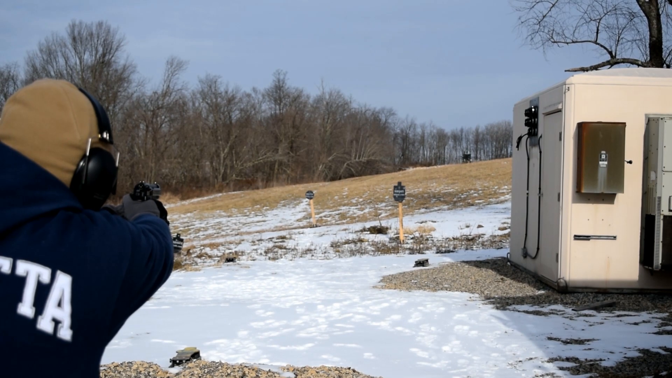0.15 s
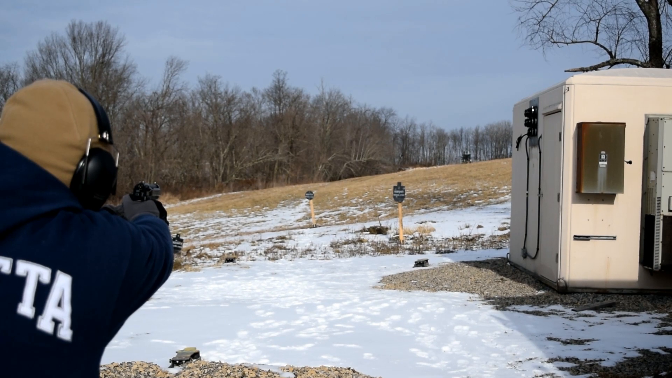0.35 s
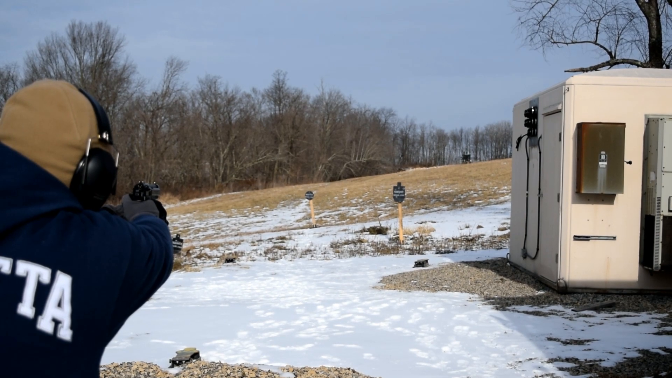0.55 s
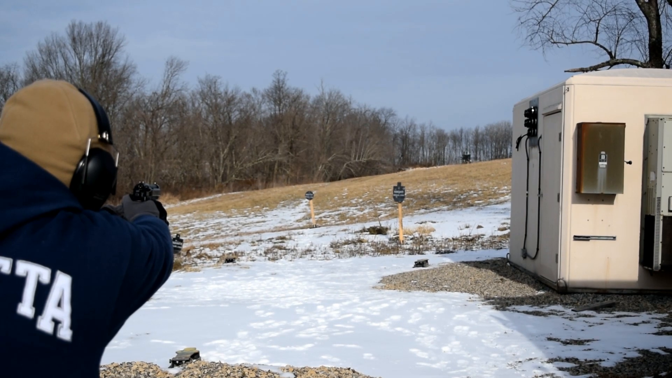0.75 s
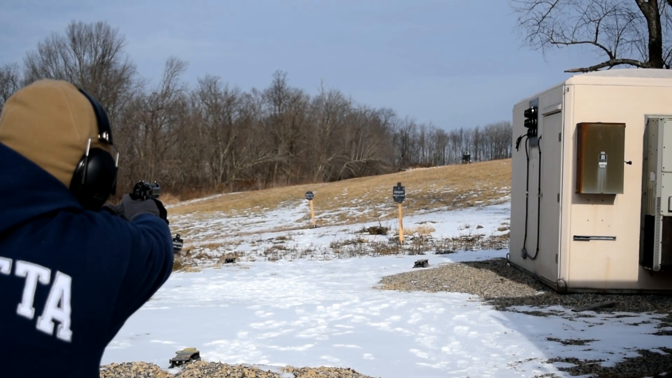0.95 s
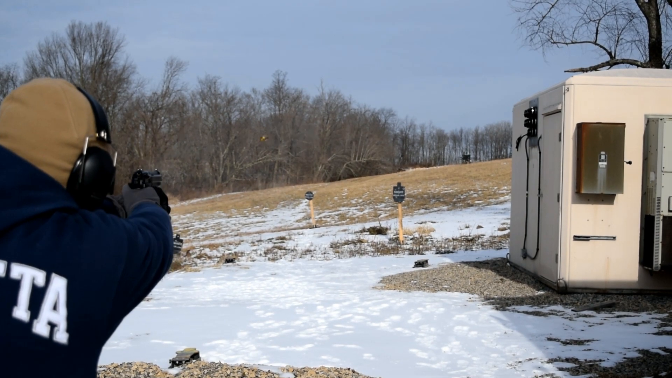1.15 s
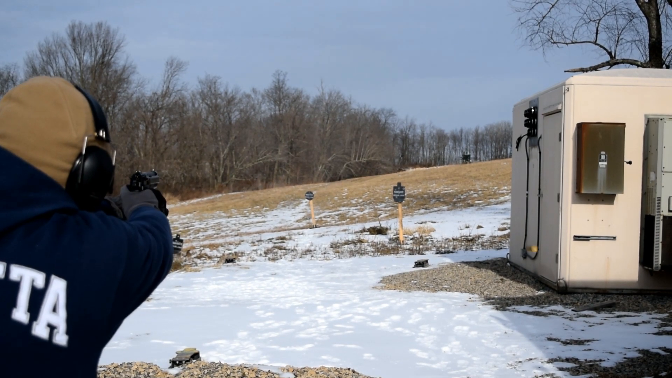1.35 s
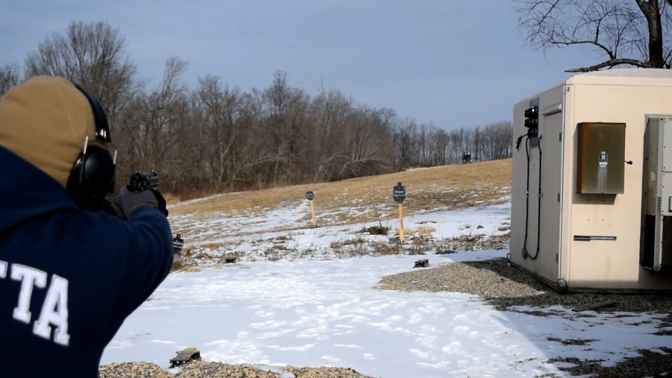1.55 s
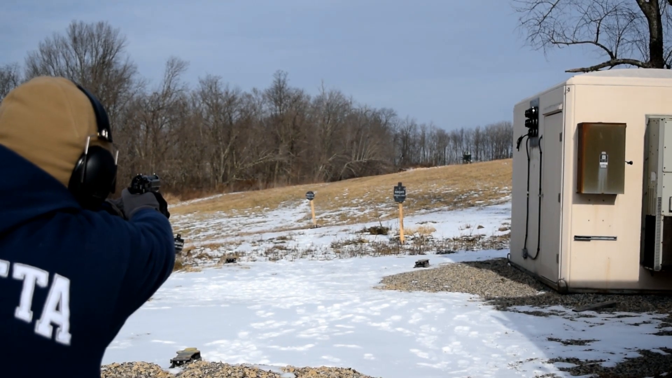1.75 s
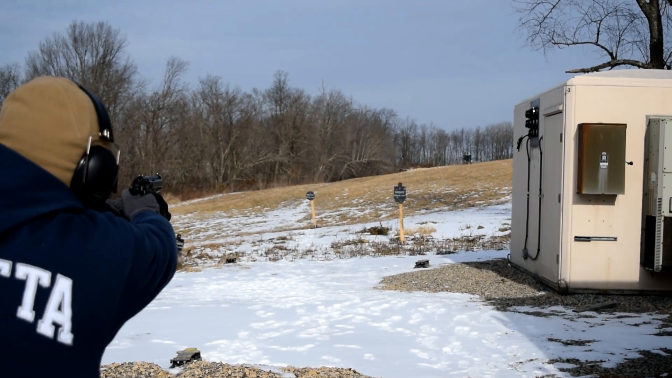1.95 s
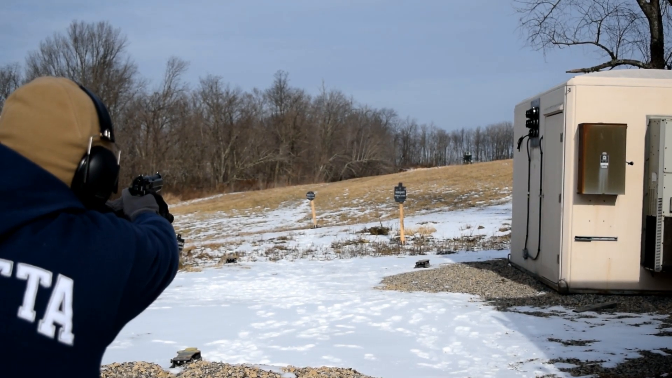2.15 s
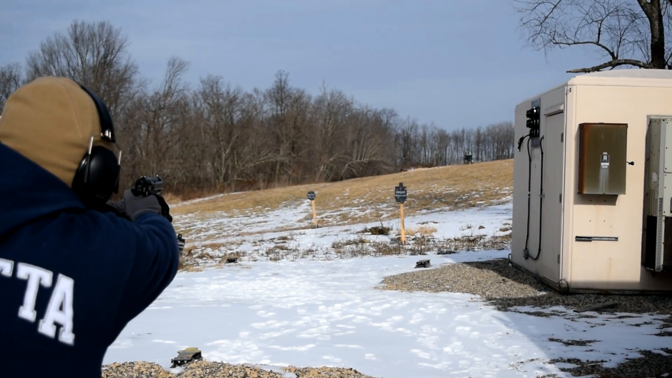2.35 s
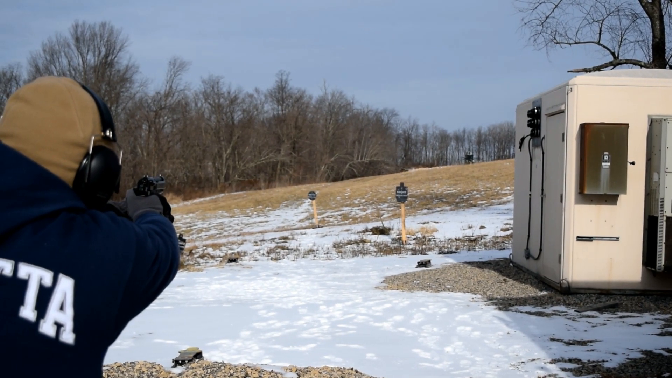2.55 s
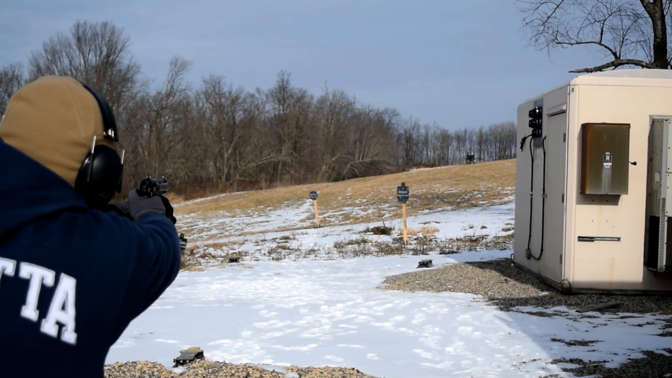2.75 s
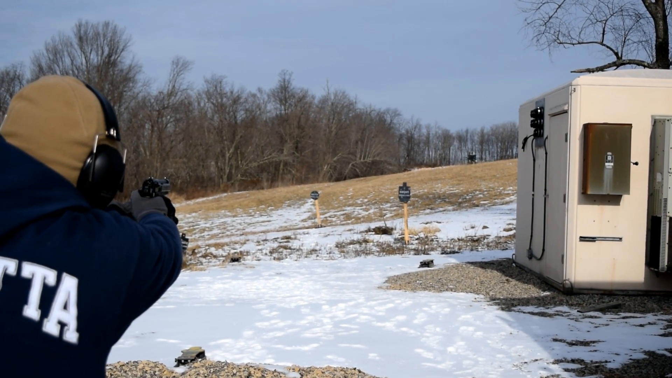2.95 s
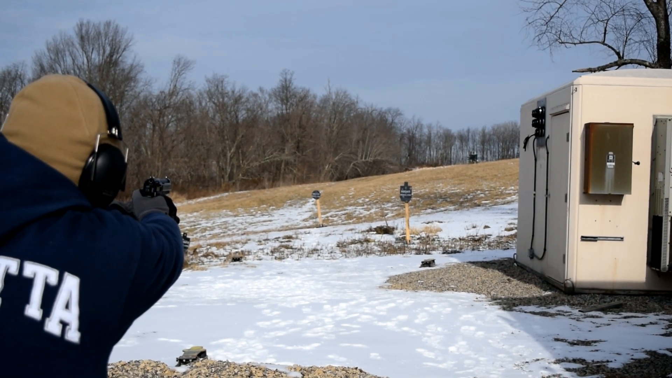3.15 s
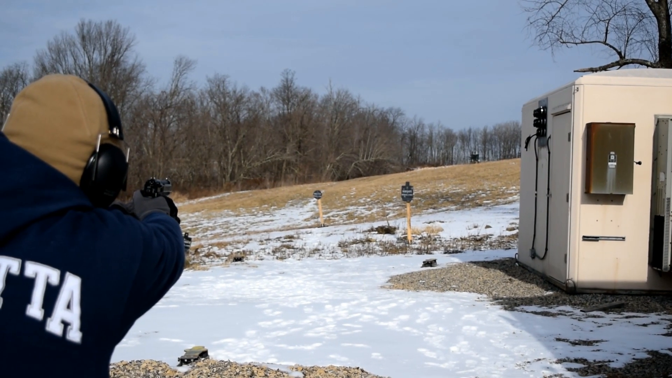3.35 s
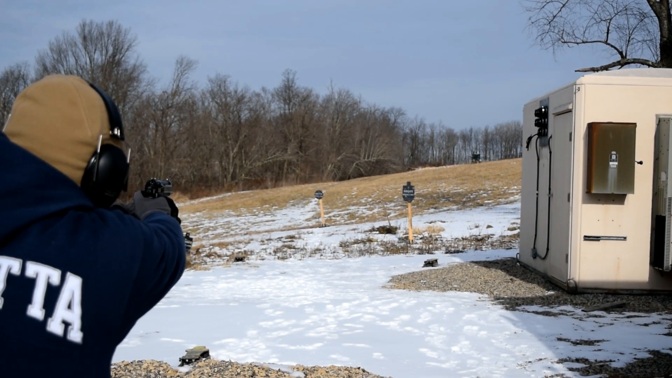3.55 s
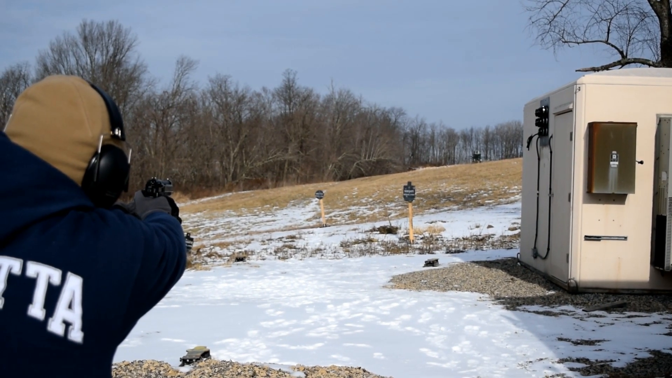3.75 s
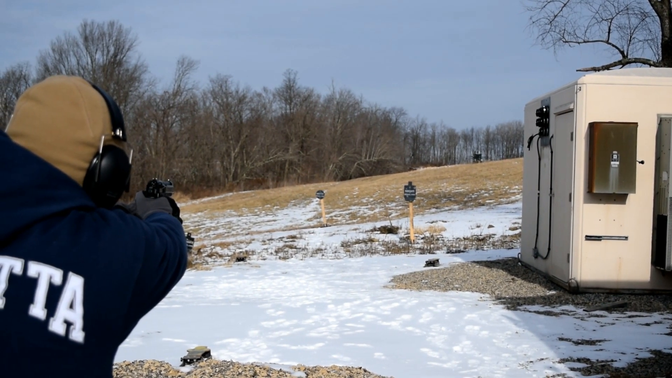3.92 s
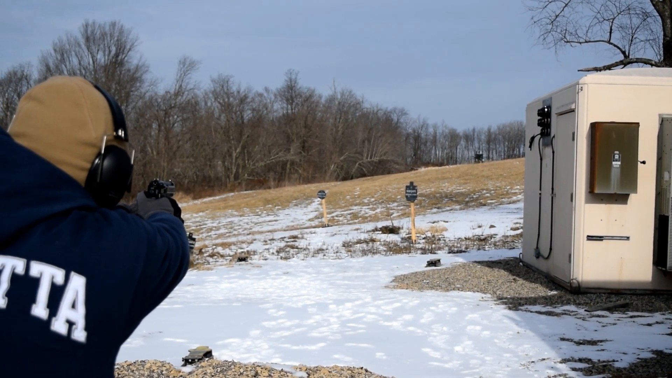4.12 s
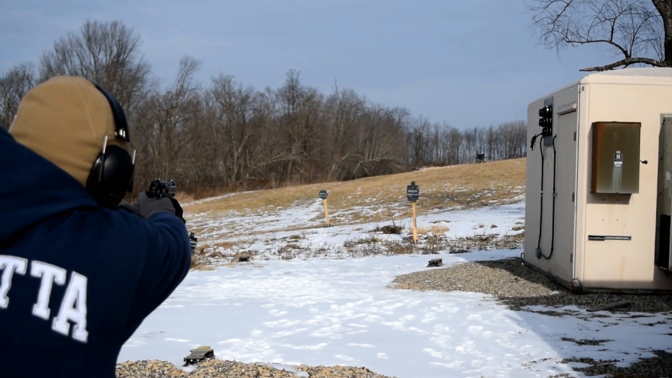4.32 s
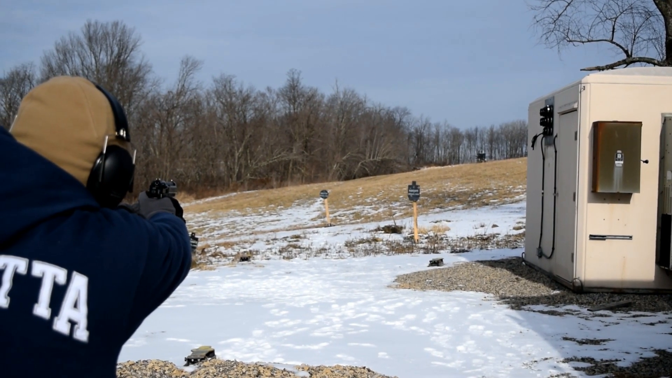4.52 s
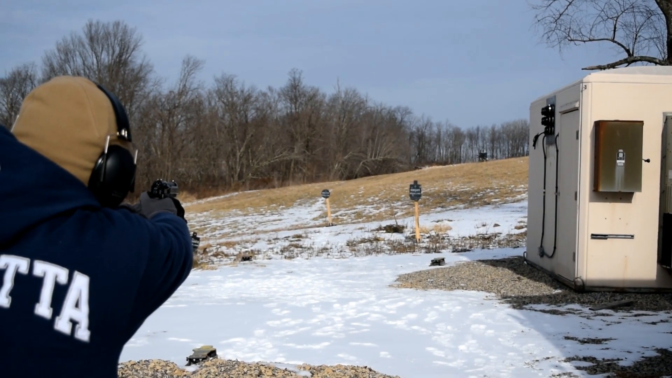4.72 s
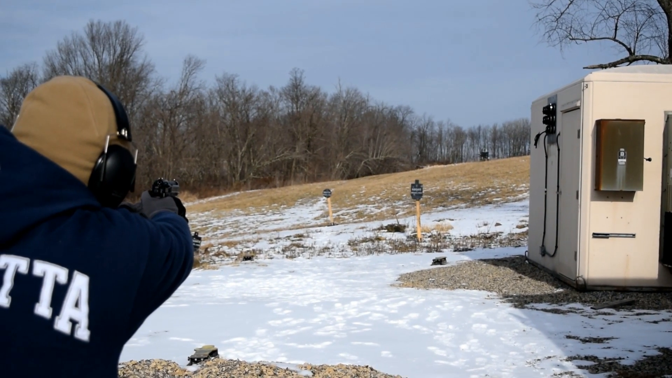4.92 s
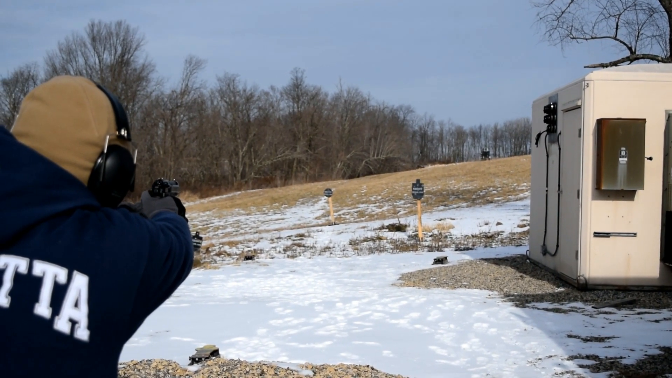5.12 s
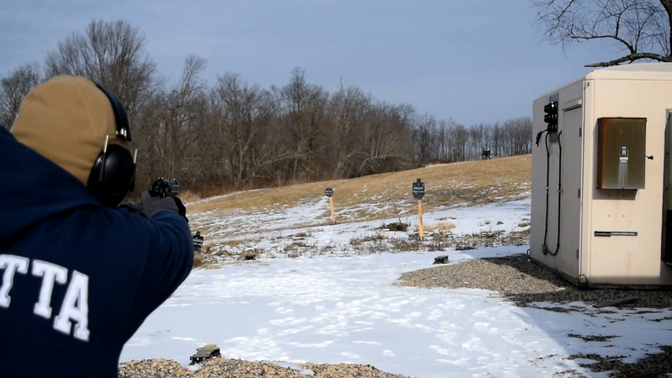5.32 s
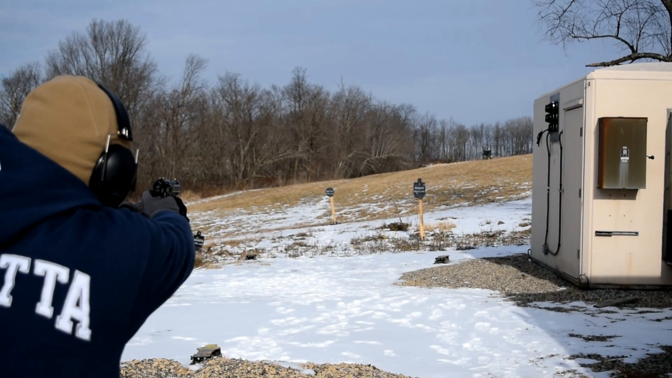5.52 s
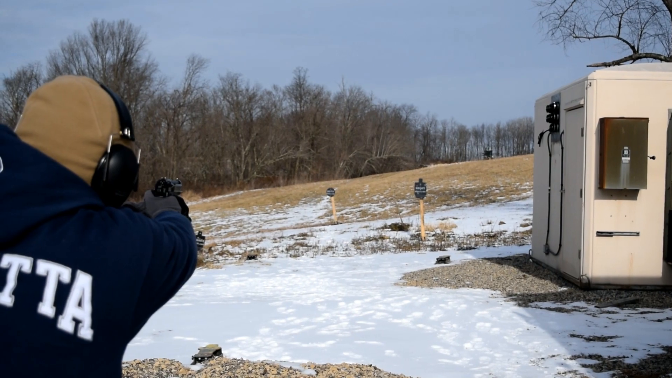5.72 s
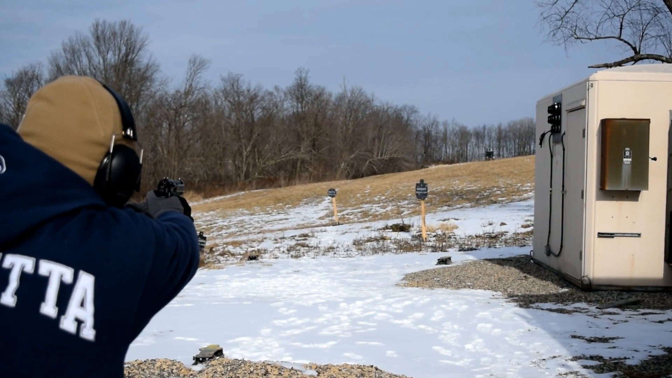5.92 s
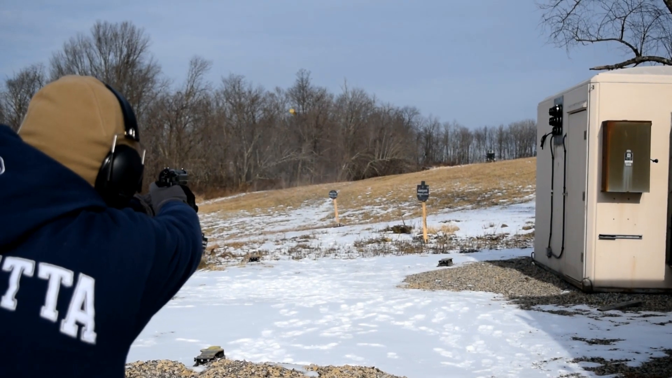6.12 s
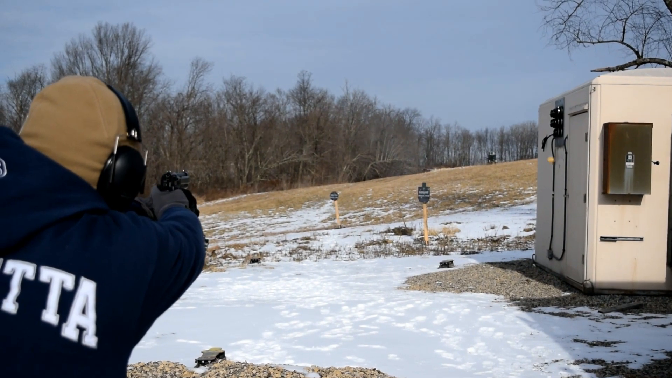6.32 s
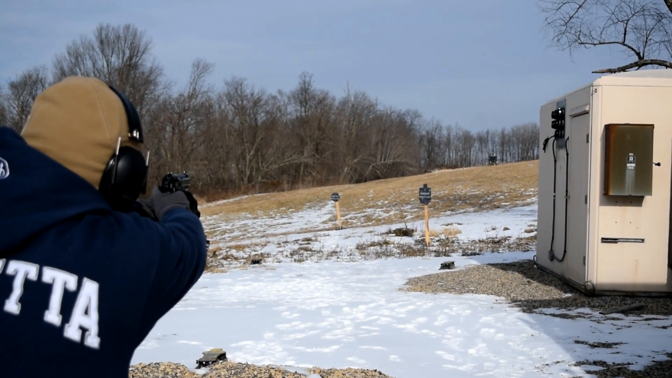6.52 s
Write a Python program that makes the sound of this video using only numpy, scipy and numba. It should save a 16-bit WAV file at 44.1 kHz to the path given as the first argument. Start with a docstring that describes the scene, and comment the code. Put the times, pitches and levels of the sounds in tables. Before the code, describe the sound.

Light wind buffets a small microphone outdoors over a faint hiss. At about 1.1 seconds a pistol fires close by, a sharp, bright crack that briefly overloads the microphone. Quick slaps return from nearby sheds and banks, then a duller echo rolls back from wooded hills, with a few dull peaks between 1.9 and 2.5 seconds, fading over the next couple of seconds. A small nearby click comes at about 3.1 seconds. Soft, low bumps and rustles of camera handling come and go between 3.5 and 5.7 seconds, along with gentle gusts. A distant bird gives two very faint falling whistles at about 4.1 and 4.4 seconds. At about 6.1 seconds a second close shot cracks, just as loud, with the same slaps and a rolling echo that is still sounding at the end, about half a second later.

```python
"""Two pistol shots on an open range, close to a small camera microphone. Each blast overloads the
microphone and steps its gain control down, slaps back from nearby sheds and banks, then rolls back from
the wooded hills for seconds. A few dull echo peaks carry the tick of the camera's gain stepping down;
other small clicks are nearby. Short low bumps and rustles of camera handling sit over light wind, and a
far bird whistles twice above a faint hiss."""
import sys
import numpy as np
from scipy import signal
from scipy.fft import rfft, irfft, next_fast_len
from scipy.io import wavfile
from scipy.ndimage import map_coordinates
from numba import njit

SR = 44100
rng = np.random.default_rng(int(sys.argv[2]) if len(sys.argv) > 2 else 0)


def generate_wav(sig):
    """Save sig (samples, or channels by samples) to the path in sys.argv[1] as 16-bit PCM at SR."""
    pcm = np.round(np.clip(np.atleast_2d(sig).T, -1, 1) * 32767).astype(np.int16)
    wavfile.write(sys.argv[1], SR, pcm)


N = 294403
TIME = np.arange(N) / SR

# The shots: start_s, gain_db (added to the levels of their cracks and echoes)
SHOTS = [(1.0986, -2), (6.0678, -0.5)]
# Spectrum of a near reflection: frequency_hz, level_db
SHARP_COLOUR = [(60, -58), (100, -26), (560, -7), (1200, -8.5), (2040, -12), (2300, -11), (2600, -4.5),
                (3050, -13), (3400, -16.5), (7140, -24.5), (8460, -28.5), (16000, -40)]
# Spectrum after a path through air and trees: frequency_hz, level_db
DULL_COLOUR = [(100, -69), (300, -24.5), (400, -15), (600, -5), (860, 1), (1200, -8), (1550, -22),
               (2630, -31), (3250, -47), (6800, -66.5), (12000, -83.5)]


def muzzle():
    """The bright crack at the muzzle, close up: two beats about a millisecond apart."""
    beats = [(0, 2.5), (.0012, 15)]  # delay_s, level_db
    return cracks([(start + delay, shot_db + db) for start, shot_db in SHOTS for delay, db in beats])


def slaps():
    """Each surface returns a sharp pulse and a dull packet as long as it is deep; broad ones thump."""
    # Single reflections: delay_s, sharp_db, dull_db, pitch_hz, spread_s
    surfaces = [(0, 15.5, 14, 820, 0.0016), (.054, 7, 14, 824, 0.0015), (0.062, 0.5, 1, 1029, 0.0058),
                (0.0673, 2.5, -9.5, 1006, 0.0042), (.079, -18, 12.5, 736, 0.0008),
                (0.0812, 2, -18.5, 1060, .0039), (.1065, -16.5, 3.5, 930, 0.0028),
                (0.124, 3.5, 3, 1010, 0.0016), (0.1274, 8.5, 13.5, 1360, 0.00065),
                (0.1708, 17.5, 15, 1320, 0.00098), (0.1448, -12.5, -16, 990, 0.0029),
                (.155, -15, -5, 1000, 0.0015), (0.202, -4, -10, 1000, 0.0045),
                (0.225, -7.5, -5, 1040, 0.0019), (0.248, -21, -11, 1060, 0.002),
                (.339, -19, 8.5, 936, 0.00053), (.346, -27, -2.5, 906, .0015),
                (.358, -12.5, -11, 900, 0.0037), (.377, -19, 0.5, 775, 0.0026),
                (0.401, -24, 3.5, 936, 0.0036), (.423, -15, 8.5, 826, 0.0034), (0.498, -19, 9, 956, 0.0025),
                (.448, -18, -0.5, 900, .004), (0.902, -52, 10.5, 856, 0.0049),
                (1.403, -48, -5.5, 883, 0.0075), (1.76, -36, -10.5, 915, 0.0016),
                (1.871, -38, -13, 950, 0.0019)]
    broad_surfaces = [(0, -3.5), (0.053, -3.5), (.082, -22.5), (.17, -17.5), (0.281, -17.5), (.315, -11),
                      (0.339, -13.5)]  # bass returns: delay_s, peak_db
    thump_colour = [(20, -5.5), (50, 0.5), (110, 2.5), (220, -1), (350, -14.5), (700, -51.5), (2000, -65.5)]  # frequency_hz, level_db
    sharp, dull, thump = np.zeros((3, N + 3 * SR))
    t = TIME[:SR // 10]
    pulse = t == 0
    for start, shot_db in SHOTS:
        for delay, sharp_db, dull_db, pitch_hz, spread in surfaces:
            at = round((start + delay) * SR)
            rough_edge = 0.22 * amp(-60 * t / 0.006) * rng.standard_normal(len(t))
            sharp[at:][:len(t)] -= amp(shot_db + sharp_db) * (pulse + rough_edge)
            packet = t / spread * np.exp(.5 - .5 * (t / spread) ** 2)
            dull[at:][:len(t)] -= amp(shot_db + dull_db) * packet * np.sin(2 * np.pi * pitch_hz * t)
        for delay, peak_db in broad_surfaces:
            at = round((start + delay) * SR)
            rumble = 0.096 * amp(-60 * t / 0.14) * rng.standard_normal(len(t))
            thump[at:][:len(t)] -= amp(shot_db + peak_db) * (pulse + rumble)
    return peak_coloured(sharp, SHARP_COLOUR) + dull[:N] + peak_coloured(thump, thump_colour)


def roll():
    """Countless trunks and slopes return the blast, strong ones in lumps and crackles, late ones duller."""
    air_loss = [(100, -0.5), (3000, 0), (5000, -2.5), (8000, -7.5), (16000, -21.5)]  # treble lost on a long path: frequency_hz, gain_db
    far_colour = [(100, -49.5), (280, -24.5), (420, -14), (650, -1), (900, -4), (1200, -12), (1550, -28),
                  (2630, -51), (5000, -74)]  # spectrum from the farthest hills: frequency_hz, level_db
    treble_loss_s = 0.23
    out = np.zeros(N)
    for start, shot_db in SHOTS:
        since = TIME - start
        sharp, dull = ground_envelopes(since)
        lumps = amp(shot_db) * unit(amp(2.2 * wobble(90))) * dull
        crackles = amp(shot_db) * unit(amp(3 * wobble(220))) * sharp
        bright = coloured(crackles * rng.standard_normal(N), SHARP_COLOUR)
        muffled = coloured(bright, air_loss) / np.abs(np.sum(response(air_loss)))  # bass keeps its level
        lost = np.clip(since / treble_loss_s, 0, 1)
        out += (1 - lost) * bright + lost * muffled
        far_mix = np.clip((since - .6) / 1.38, 0, 1) * np.pi / 2  # later returns have come farther
        out += coloured(lumps * np.cos(far_mix) * rng.standard_normal(N), DULL_COLOUR)
        out += coloured(lumps * np.sin(far_mix) * rng.standard_normal(N), far_colour)
    return out


def ground_envelopes(since):
    """Sharp and dull gains of the roll: each ground swells in, its dull part holds, both fall."""
    # Scattering grounds, near to far:
    # delay_s, swell_s, sharp_db, sharp_fall_db_per_s, dull_db, dull_hold_s, dull_fall_db_per_s
    grounds = [(0, .003, 10.5, 853, 14.5, .014, 1051), (0.039, .012, -20.5, 60.5, -7.5, 0.016, 95.5),
               (0.179, .12, -14, 34, -9.5, .16, 299), (0.329, 0.055, -30, 31.5, 2, 0.66, 35),
               (1.914, 0.077, -80, 27, -15, 0.12, 95), (1.952, 0.091, -83, 30, -29, 0.41, 31)]
    sharp_power, dull_power = np.zeros((2, N))
    for delay, swell_s, sharp_db, sharp_fall, dull_db, hold, dull_fall in grounds:
        t = np.maximum(since - delay, 0)
        swell = 1 - np.exp(-t / swell_s)
        sharp_power += (swell * amp(sharp_db - sharp_fall * t)) ** 2
        dull_power += (swell * amp(dull_db - dull_fall * np.maximum(t - hold, 0))) ** 2
    return np.sqrt(sharp_power), np.sqrt(dull_power)


def cracks(events):
    """Bright bursts of a few milliseconds with a faint tail, from rows of start_s, level_db."""
    crack_colour = [(500, -24.5), (1900, -7.5), (2650, 3.5), (3400, -1.5), (4500, 1), (5800, -3),
                    (7700, 3.5), (10500, -6), (14000, -1), (17000, -20)]  # frequency_hz, level_db
    bursts, t = np.zeros(N + SR), TIME[:SR // 20]
    for start, db in events:
        envelope = amp(db - 60 * t / 0.0074) + amp(db - 25.5 - 60 * t / 0.12)
        bursts[round(start * SR):][:len(t)] += envelope * rng.standard_normal(len(t))
    return coloured(bursts[:N], crack_colour)


def echo_peaks_and_clicks():
    """Dull echo peaks with the tick of the camera's gain stepping down, and small nearby clicks."""
    # The four rows from 1.92 to 2.38 s are the echo peaks, the rest clicks: start_s, tick_db, dull_db
    events = [(.243, -65, -28), (1.8059, -19, -26.5), (1.812, -26.5, -40), (1.863, -35.5, -14),
              (1.9228, -32, 12), (1.986, -29, 5), (2.0801, -30.5, 10), (2.3785, -37.5, -5),
              (3.0788, -10.5, -24), (3.084, -33, -34), (3.0897, -20, -18), (4.957, -51, -27),
              (6.331, -23, -29), (6.333, -15, -41), (6.336, -22, 4)]
    pulses = np.zeros(N)
    for start, _, dull_db in events:
        pulses[round(start * SR)] = amp(dull_db)
    return cracks([row[:2] for row in events]) + peak_coloured(pulses, DULL_COLOUR)


def wind():
    """Light wind buffets the microphone in low lumps."""
    strength = [(0, -39), (.23, -26), (.5, -35.5), (.65, -26.5), (.82, -32.5), (1.07, -31), (2.75, -29),
                (3.05, -32.5), (3.4, -26.5), (3.7, -25.5), (3.9, -22), (4.22, -31.5), (4.36, -22),
                (4.52, -31), (5.1, -21), (5.35, -26), (5.54, -21.5), (6.04, -36)]  # course of the buffeting: time_s, level_db
    buffet_colour = [(12, -8), (22, 5), (65, 2), (120, -6.5), (180, -20), (300, -58.5)]  # frequency_hz, level_db
    buffet_db = np.interp(TIME, *np.transpose(strength))
    return amp(buffet_db) * unit(amp(1.8 * wobble(15)) * noise(buffet_colour))


def handling():
    """Short low bumps and rustles of camera handling, rising from a soft bed of noise over the wind."""
    bumps = [(0.659, 0.054, 2), (3.099, 0.026, 0.5), (3.558, 0.042, 11), (3.81, 0.027, 7.5),
             (3.9, 0.015, 8.5), (4.36, .02, -3), (4.7, 0.036, 7.5), (4.97, .04, 0), (5.66, 0.025, 5.5)]  # centre_s, spread_s, rise_db
    rustle_colour = [(90, -36), (170, -4), (260, -3.5), (340, -9), (530, -12.5), (750, -16.5), (960, -15.5),
                     (1250, -30), (1800, -63)]  # frequency_hz, level_db
    bed_db = -37.5
    rise_db = sum(db * np.exp(-.5 * ((TIME - centre) / spread) ** 2) for centre, spread, db in bumps)
    rustle = unit(amp(1.1 * wobble(25) + 1.1 * wobble(5)) * noise(rustle_colour))
    return amp(bed_db + rise_db) * rustle


def bird():
    """A far bird's whistles slide down and flutter on their long way through moving air."""
    whistles = [(4.135, .14, 2700, 1500, .16, -60), (4.415, .13, 2900, 2090, .033, -60.5)]  # start_s, length_s, start_hz, aim_hz, glide_s, level_db
    fade_s = 0.017
    out = np.zeros(N)
    for start, length, start_hz, aim_hz, glide, db in whistles:
        t = TIME - start
        envelope = np.clip(np.minimum(t, length - t) / fade_s, 0, 1)
        flutter = amp(db + 3.3 * wobble(110))
        pitch_hz = aim_hz + (start_hz - aim_hz) * np.exp(-np.maximum(t, 0) / glide) + 35 * wobble(150)
        out += envelope * flutter * np.sqrt(2) * np.sin(2 * np.pi * np.cumsum(pitch_hz) / SR)
    return out


def hiss():
    """The microphone's own steady noise."""
    hiss_colour = [(300, -23), (1000, 7.5), (2000, -1), (7000, -4.5), (13500, -4), (16000, -5)]  # frequency_hz, level_db
    return amp(-50) * noise(hiss_colour)


@njit
def gain_control(x, limit, step, wait_s, hold_s, rise, glide):
    """Gain drops a step when a peak passes the limit, at most once per wait; it recovers after a hold."""
    out = np.empty(len(x))
    aim, gain, since_step = 1., 1., 1e9
    for i in range(len(x)):
        if abs(x[i] * gain) > limit and since_step > wait_s * SR:
            aim, since_step = aim * step, 0.
        elif since_step > hold_s * SR:
            aim = min(1., aim * rise)
        since_step += 1
        gain += glide * (aim - gain)
        out[i] = x[i] * gain
    return out


def amp(db):
    """dB to gain."""
    return 10 ** (np.asarray(db) / 20)


def unit(x):
    """x at rms 1."""
    return x / np.sqrt(np.mean(x ** 2) + 1e-20)


def wobble(rate):
    """A smooth random curve, rate knots a second."""
    return map_coordinates(rng.standard_normal(int(N * rate / SR) + 4), [TIME * rate])


def response(colour, size=4096):
    """Causal impulse response of energy 1 for rows of frequency_hz, level_db."""
    hz, db = np.transpose(colour)
    bin_db = np.interp(np.log(np.fft.rfftfreq(size, 1 / SR) + 1), np.log(hz), db)
    cepstrum = irfft(np.log(amp(bin_db)))
    cepstrum[1:size // 2] *= 2  # fold to minimum phase
    cepstrum[size // 2 + 1:] = 0
    impulse = irfft(np.exp(rfft(cepstrum)))
    return impulse / np.linalg.norm(impulse)


def coloured(x, colour):
    """x heard through a spectrum."""
    return signal.fftconvolve(x, response(colour))[:N]


def peak_coloured(x, colour):
    """x through a spectrum, scaled so that a lone pulse keeps its peak."""
    return coloured(x, colour) / np.max(np.abs(response(colour)))


def noise(colour):
    """Noise of rms 1 with a spectrum."""
    return coloured(rng.standard_normal(N), colour)


def scene():
    """The range at one microphone, close to the pistol."""
    return (muzzle() + slaps() + roll() + echo_peaks_and_clicks()
            + wind() + handling() + bird() + hiss())[None]


def record(dry):
    """The camera: stepped gain control, overload, a coupling capacitor and the band limit."""
    ceiling, coupling_hz, top_hz = 0.84, 140, 15800
    x = gain_control(dry[0], limit=.62, step=amp(-1.3), wait_s=.016, hold_s=.06,
                     rise=amp(46 / SR), glide=.55)  # recovers at 46 dB a second
    x = x / (1 + np.abs(x / ceiling) ** 6) ** (1 / 6)  # overload flattens the peaks
    x = signal.lfilter(*signal.butter(1, coupling_hz, "high", fs=SR), x)  # tilts the flat tops
    x = np.clip(x, -1, 1)
    size = next_fast_len(N + 4096)
    passband = np.fft.rfftfreq(size, 1 / SR) < top_hz
    return irfft(rfft(x, size) * passband, size)[None, :N]


dry = scene()
out = record(dry)
generate_wav(out)
```